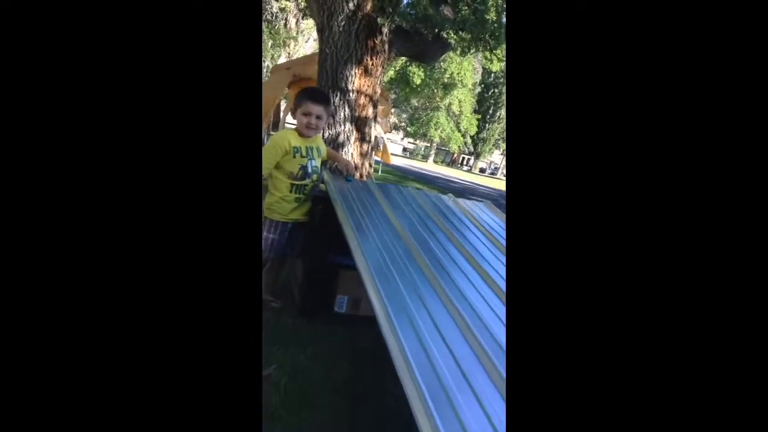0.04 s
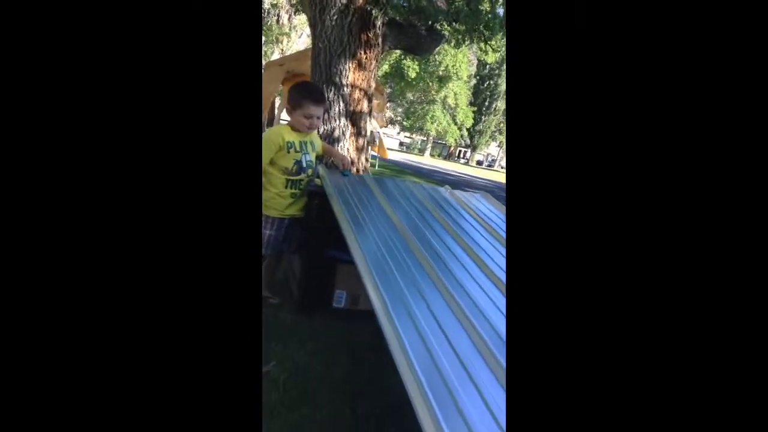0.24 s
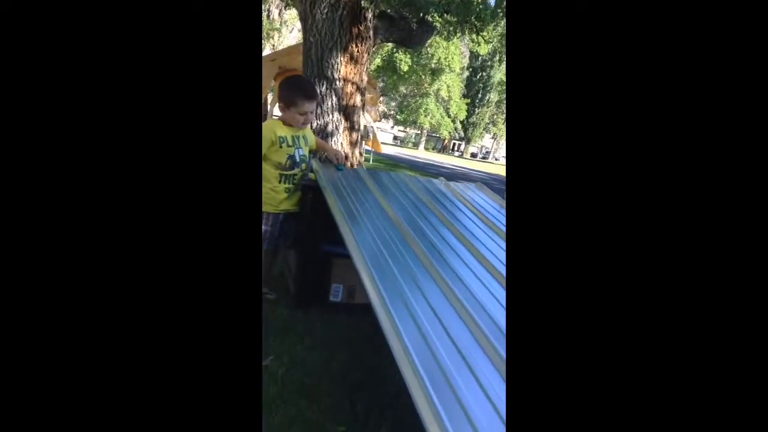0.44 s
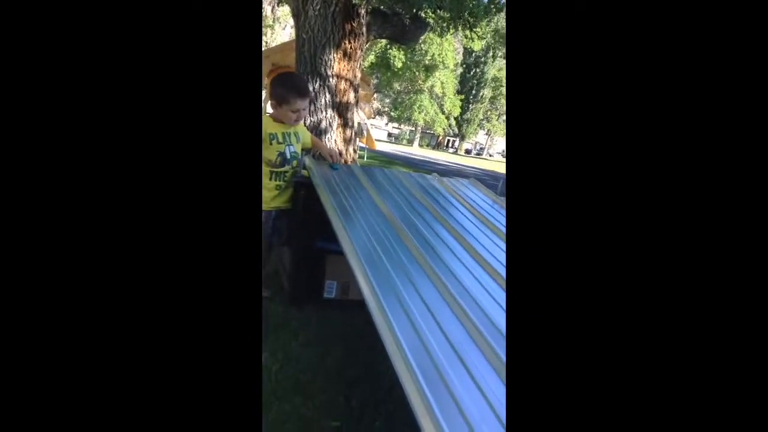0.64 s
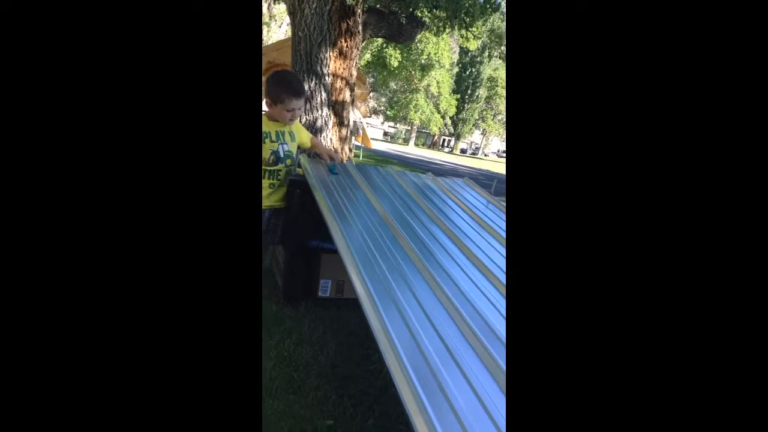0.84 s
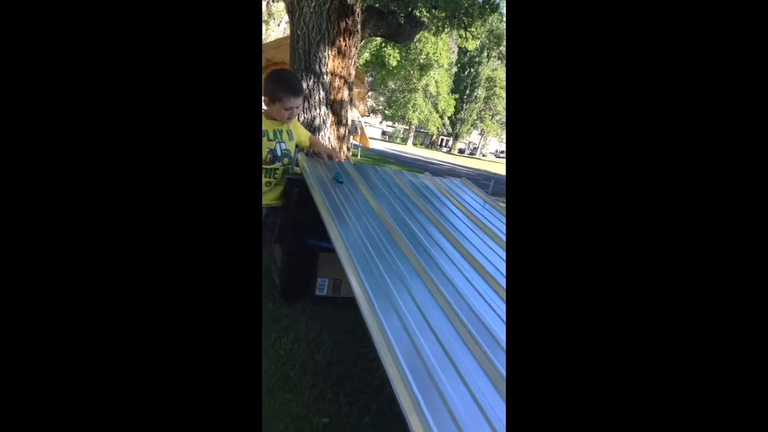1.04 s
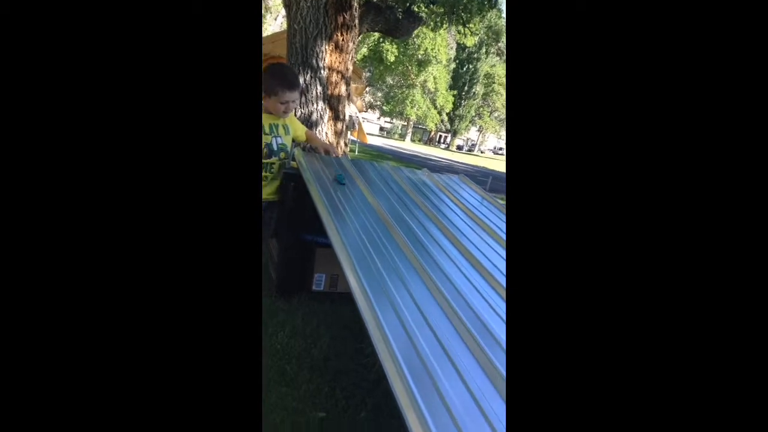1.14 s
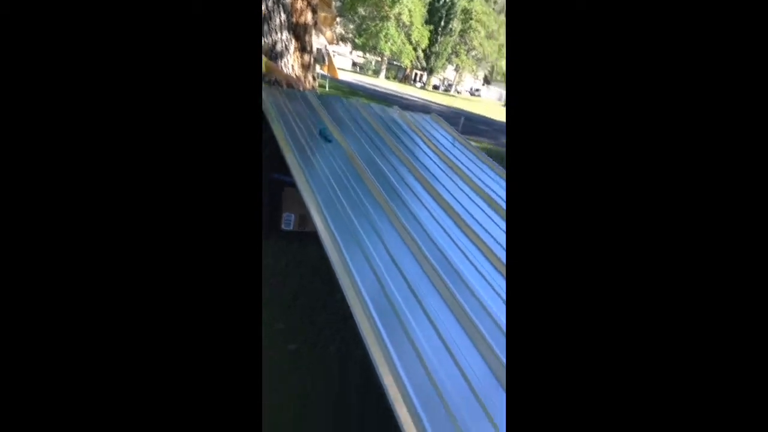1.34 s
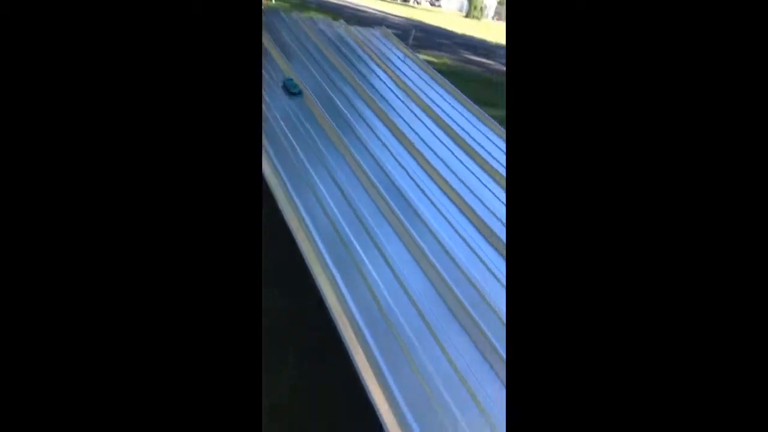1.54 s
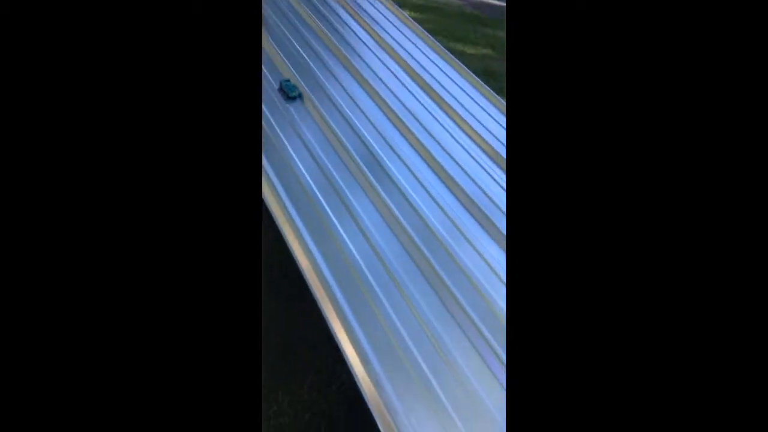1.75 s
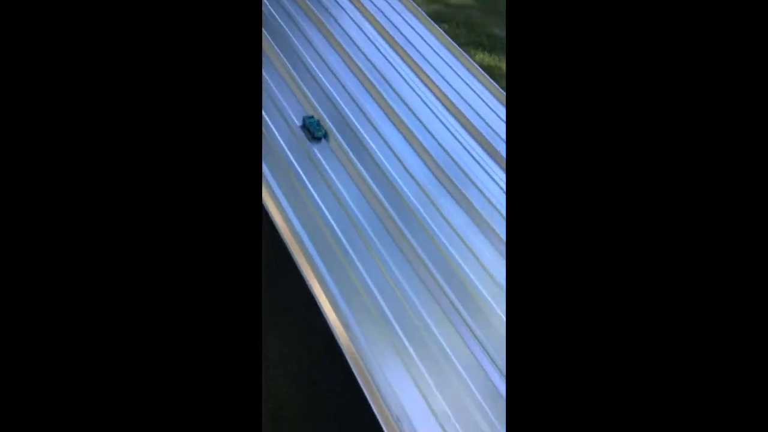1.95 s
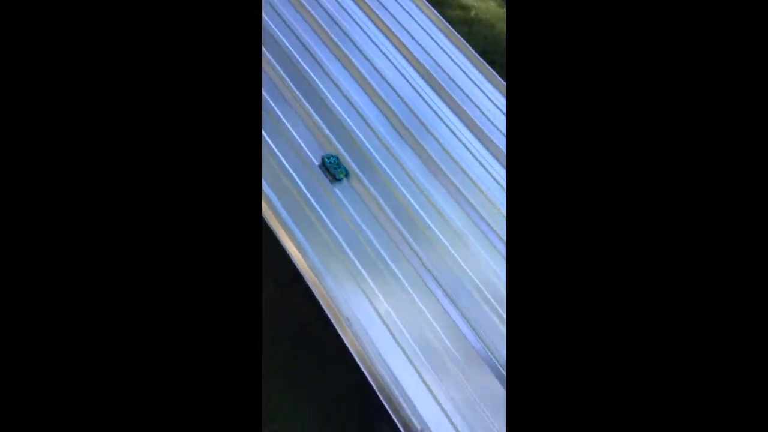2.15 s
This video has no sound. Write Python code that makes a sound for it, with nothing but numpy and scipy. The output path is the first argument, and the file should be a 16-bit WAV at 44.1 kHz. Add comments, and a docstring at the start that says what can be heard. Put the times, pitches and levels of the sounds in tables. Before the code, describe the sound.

Hard toy car wheels chatter down a corrugated metal ramp outdoors, starting softly under faint birds. The metallic rattle grows louder and closer to the microphone, with a low rumble from the sheet and quick clicking knocks later on.

```python
"""Far birds whistle over a quiet garden hush. From about 0.35 s a small toy car rolls down a propped-up
corrugated metal sheet: its hard wheels chatter, dense tiny contacts ring the metal, axles tick and the
sheet booms low. The rush grows as the car speeds up and nears, and from 0.85 s its body rings near 3 kHz.
From 1.3 s the body knocks on the sheet, and the metal changes colour from stretch to stretch."""
import sys
import numpy as np
from scipy import signal
from scipy.fft import rfft, irfft, next_fast_len
from scipy.io import wavfile

SR = 44100
rng = np.random.default_rng(int(sys.argv[2]) if len(sys.argv) > 2 else 0)


def wav_record(signal):
    """Record a signal, one row per channel, as 16-bit PCM in the file named by sys.argv[1]."""
    frames = np.transpose(np.atleast_2d(signal))
    bounded = np.clip(frames, -1, 1)
    # unit amplitude maps onto the largest positive 16-bit level
    quanta = np.round(bounded * 32767).astype(np.int16)
    wavfile.write(sys.argv[1], SR, quanta)


N = 96534
T = np.arange(N) / SR
FFT_SIZE = next_fast_len(N + SR // 4)
HZ = np.maximum(np.arange(FFT_SIZE // 2 + 1) * SR / FFT_SIZE, 1)
ROLL_START_S, FADE_IN_S = 0.34, 0.07

# resonance of the car's body, sinking as it nears: (time [s], pitch [Hz], level [dB])
BODY_RESONANCE = [(.85, 3150, -43), (1.21, 3000, -33), (1.27, 3000, -36.5), (1.34, 3050, -28.5),
                  (1.45, 2950, -32.5), (1.66, 2800, -28), (1.74, 2855, -31.5), (1.86, 2706, -30),
                  (1.95, 2740, -24), (1.98, 2750, -45)]


def amp(db):
    """dB to gain."""
    return 10 ** (np.asarray(db) / 20)


def unit(x):
    """Scale to rms 1."""
    return x / np.sqrt(np.mean(x ** 2) + 1e-20)


def automation(rows):
    """One curve over time for each value column of a table."""
    times, *columns = np.transpose(rows)
    return [np.interp(T, times, column) for column in columns]


def eq_curve(points):
    """Gain at each frequency, drawn through (Hz, dB) points on a log axis."""
    hz, db = np.transpose(points)
    return amp(np.interp(np.log(HZ), np.log(hz), db))


def drift(rate_hz):
    """Smooth random modulation, rms about 1."""
    pole = np.exp(-80 * np.pi * rate_hz / SR)  # runs at one step per 40 samples
    slow = signal.lfilter([1], [1, -2 * pole, pole * pole], rng.standard_normal(N // 40 + 2002))[2000:]
    return np.interp(np.arange(N) / 40, np.arange(len(slow)), unit(slow))


def resonance(hz, width_hz):
    """Response of one mode, 1 at its centre."""
    return 1j * HZ * width_hz / (hz ** 2 - HZ ** 2 + 1j * HZ * width_hz)


def ring(start, db, hz, t60, rise_cycles=2):
    """A struck mode: a sine that swells in and dies away."""
    age = np.maximum(T - start, 0)
    attack = np.sin(np.minimum(age * hz / rise_cycles, 1) * np.pi / 2) ** 2
    return amp(db - 60 * age / t60) * np.sin(2 * np.pi * hz * age) * attack


def ramp(centre_s, length_s):
    """Linear fade from 0 to 1."""
    return np.clip((T - centre_s) / length_s + .5, 0, 1)


def bands(spectrum):
    """Split into overlapping third-octave bands: (centre [Hz], sound)."""
    for hz in 40 * 2 ** (np.arange(27) / 3):
        window = np.clip(1 - 3 * np.abs(np.log2(HZ / hz)), 0, 1)
        yield hz, irfft(spectrum * window, FFT_SIZE)[:N]


def pitched_noise(hz, width_hz):
    """A band of noise riding a moving pitch, rms 1."""
    phase = 2 * np.pi * np.cumsum(hz) / SR
    lowpass = signal.butter(2, width_hz / 2, fs=SR, output="sos")
    a, b = signal.sosfilt(lowpass, rng.standard_normal((2, N)))
    return unit(a * np.cos(phase) + b * np.sin(phase))


def garden_hush():
    """Leaves, far traffic and far birds blur into a noise bed whose bands swell and sink."""
    # tone of the bed: (frequency [Hz], relative level [dB])
    colour = [(40, -37), (108, -9.5), (200, -9), (400, -14.5), (784, -9.5), (2170, -15.5), (3560, -6),
              (5200, -15), (5600, -23), (7500, -30.5), (10000, -41), (15000, -43)]
    level_db, flutter_db = -50.5, 3.24
    noise = rfft(rng.standard_normal(FFT_SIZE)) * eq_curve(colour)
    return amp(level_db) * unit(sum(band * amp(flutter_db * drift(6.1)) for _, band in bands(noise)))


def birds():
    """Thin gliding whistles, blurred by distance, with one echo."""
    # whistles: (start [s], length [s], start pitch [Hz], end pitch [Hz], level [dB])
    notes = [(0, .13, 3720, 3680, -62), (.145, .04, 3450, 3750, -51), (.225, .055, 3050, 2680, -53),
             (.29, .07, 2800, 2900, -61), (.39, .03, 3650, 3950, -54), (.43, .02, 2950, 2900, -52),
             (.44, .05, 3800, 3850, -57), (.505, .03, 3700, 3450, -52), (.54, .06, 4050, 3800, -56)]
    echo_lag, echo_db = int(.03 * SR), -12
    out = np.zeros(N)
    for start, length, hz_from, hz_to, db in notes:
        hz = np.interp(T, [start, start + length], [hz_from, hz_to])
        whistle = np.sin(2 * np.pi * np.cumsum(hz) / SR) + 0.6 * pitched_noise(hz, width_hz=120)
        gate = ramp(start, .018) - ramp(start + length, .012)
        out += amp(db) * gate * whistle
    out[echo_lag:] += amp(echo_db) * out[:-echo_lag]
    return out


def sheet_boom():
    """The sheet's lowest modes, shaken by the rolling and twice thumped."""
    # swell of the boom: (time [s], level [dB])
    swell = [(.42, -62), (.5, -49), (.61, -53), (.72, -54), (.78, -49), (.92, -46), (1.07, -52.5),
             (1.22, -44), (1.37, -43.5), (1.7, -46), (1.9, -48), (2.0, -43), (2.19, -42.5)]
    # low modes: (pitch [Hz], width [Hz], relative level [dB])
    modes = [(151.5, 32.4, -6), (236.5, 75, -0.5), (296.4, 32.7, 1.5), (359, 10.2, -3)]
    # dull thumps: (time [s], level [dB], base pitch [Hz], t60 [s])
    hits = [(0.662, -33, 135, 0.075), (1.958, -29, 210, 0.07)]
    response = sum(amp(db) * resonance(hz, width) * (-1) ** k for k, (hz, width, db) in enumerate(modes))
    response *= np.minimum(400 / HZ, 1) ** 2
    shake = unit(irfft(rfft(rng.standard_normal(FFT_SIZE)) * response, FFT_SIZE)[:N])
    rumble = amp(automation(swell)[0]) * shake * ramp(ROLL_START_S, FADE_IN_S)
    thumps = sum(ring(start, db, ratio * hz, t60)
                 for start, db, hz, t60 in hits for ratio in (0.89, 1.45, 1.6))
    after_ring = ring(start=.688, db=-36, hz=295, t60=.3, rise_cycles=6)  # follows the first thump
    return rumble + thumps + after_ring


def axle_ticks():
    """Each tick touches twice and strikes the axle's modes unevenly."""
    # ticks: (time [s], mean level of each mode [dB])
    hits = [(0.553, -48), (0.5965, -51), (0.6245, -53), (0.6862, -47), (0.8096, -45), (1.254, -35),
            (2.167, -34)]
    modes_hz, spread_db, bounce_s = (6220, 6230, 7100, 7450), 9, .007
    return sum(ring(start + lag, db + spread_db * rng.standard_normal(), hz, t60=.024, rise_cycles=10)
               for start, db in hits for hz in modes_hz for lag in (0, bounce_s))


def body_ring():
    """The car's body rings as a noisy band that wavers in pitch and flickers in level."""
    pitch_hz, level_db = automation(BODY_RESONANCE)
    flicker_db, wander_hz = 2.2 * drift(24), 50 * drift(24.8)
    tone = pitched_noise(pitch_hz + wander_hz, width_hz=420)
    return amp(level_db + flicker_db) * tone * ramp(BODY_RESONANCE[0][0], FADE_IN_S)


def body_knocks():
    """The body knocks hard on the sheet and pings at its pitch of that moment."""
    # knocks: (time [s], level [dB])
    hits = [(1.3176, -7), (1.3297, -12), (1.356, -12.5), (1.3859, -7.5), (1.4816, -19.5), (1.508, -10),
            (1.6402, -15), (1.8787, -9), (1.9057, -7.5), (1.933, -15)]
    pitch_hz, _ = automation(BODY_RESONANCE)
    return sum(ring(start, db, pitch_hz[int(start * SR)], t60=.011) for start, db in hits)


def wheel_jolts():
    """Gain in dB: each jolt briefly lifts or dips the rolling rush."""
    # jolts: (time [s], gain [dB])
    bumps = [(0.413, -4), (1.052, 1.5), (1.1012, 7), (1.198, 1.5), (1.515, 0)]
    rise_s, fade_s = .0034, .011
    return sum(db * ramp(start, rise_s) * np.exp(-np.maximum(T - start, 0) / fade_s)
               for start, db in bumps)


def wheel_contacts():
    """Force of hard wheels on metal: dense, uneven clicks over smooth noise."""
    contacts_per_s, spread_db, noise_share = 5000, 1.5, 0.43
    sizes = amp(spread_db * np.minimum(rng.exponential(1, N), 5)) * rng.choice([-1, 1], N)
    clicks = sizes * (rng.random(N) < contacts_per_s / SR)
    return unit(clicks) + noise_share * rng.standard_normal(N)


def sheet_ring(force):
    """The wheels ring the sheet's many close modes; each of four stretches has its own set and colour."""
    # overall tone of the metal: (frequency [Hz], relative level [dB])
    colour = [(240, -36), (400, -14.5), (830, -9.5), (1200, -5.5), (2030, -5.5), (2830, -1), (4960, -8.5),
              (6500, -12), (8300, -17.5), (9700, -27.5), (11500, -26.5), (15200, -34.5)]
    # broad rings: (pitch [Hz], width [Hz], strength on stretch 1, 2, 3, 4 from the top down [dB])
    broad_rings = [(1027, 180, -5, 8.5, 2, -19), (1330, 90, -21, -5, 3, -13),
                   (1670, 530, 0.5, -9.5, -14.5, -31), (2236, 152, -5, 1.5, 6.5, -6),
                   (3752, 235, 6.5, 0, -8.5, -10), (4530, 86, 0, -4, -12, -5),
                   (6000, 1840, -19, -12, -9.5, -3), (6700, 1440, -1, -7, -15, -22)]
    stretch_ends_s, crossfade_s = (1.3, 1.51, 1.96), .04
    low_cut = np.minimum(HZ / colour[0][0], 1) ** 4
    drive = rfft(force, FFT_SIZE) * eq_curve(colour) * low_cut
    entered = [1, *(ramp(end, crossfade_s) for end in stretch_ends_s), 0]
    out = np.zeros(N)
    for k in range(4):
        modes = 1 + 1.26 * sum(resonance(hz, width_hz=10) for hz in rng.uniform(499.3, 12000, size=50))
        rings = 1 + sum(amp(db[k]) * resonance(hz, width) ** 2 for hz, width, *db in broad_rings)
        out += (entered[k] - entered[k + 1]) * unit(irfft(drive * modes * rings, FFT_SIZE)[:N])
    return out


def rolling_rush():
    """Wheel chatter on the sheet grows with speed and nearness, flickering band by band."""
    # force of the rolling: (time [s], level [dB], treble above 9 kHz [dB, neutral at -18])
    approach = [(.38, -60, -42.5), (.44, -49, -40), (.52, -54, -30), (.62, -50.5, -32), (.74, -44, -30),
                (.8, -38.5, -30), (.9, -34, -26), (1.03, -31, -24), (1.21, -28, -21.5), (1.27, -31, -18),
                (1.33, -26.5, -21.5), (1.52, -24.5, -16.5), (1.62, -26, -18.5), (1.85, -23, -18),
                (1.96, -23.5, -15.5), (2.05, -24, -12.5), (2.19, -23, -15)]
    level_db, treble_db = automation(approach)
    force = wheel_contacts()
    flutter_db, sparkle_db = 0.7 * drift(12), 0.65 * drift(50)
    rush = np.zeros(N)
    for hz, band in bands(rfft(sheet_ring(force), FFT_SIZE)):
        if hz > 200:
            flicker_db = flutter_db + 1.49 * drift(5) + sparkle_db * (hz > 4000)
            shelf_db = (treble_db + 18) * (hz > 9000)
            rush += band * amp(flicker_db + shelf_db)
    return amp(level_db + wheel_jolts()) * rush * ramp(ROLL_START_S, FADE_IN_S)


def scene():
    """Car, sheet and garden, the same on both channels."""
    car = rolling_rush() + body_ring() + body_knocks() + axle_ticks()
    return np.tile(car + sheet_boom() + birds() + garden_hush(), (2, 1))


def record(dry):
    """A gentle bass roll-off and a steep top cut."""
    low_cut = signal.butter(2, 80, "high", fs=SR, output="sos")
    high_cut = signal.cheby2(24, 60, 15500, fs=SR, output="sos")
    return signal.sosfilt(high_cut, signal.sosfilt(low_cut, dry))


dry = scene()
out = record(dry)
wav_record(out)
```